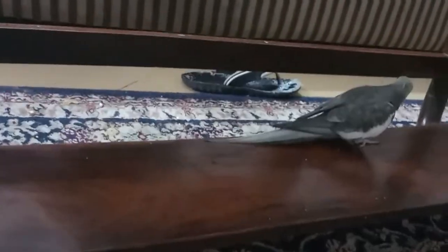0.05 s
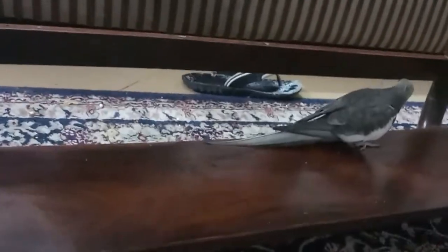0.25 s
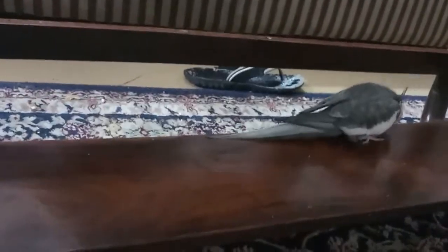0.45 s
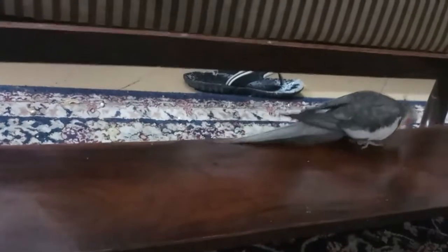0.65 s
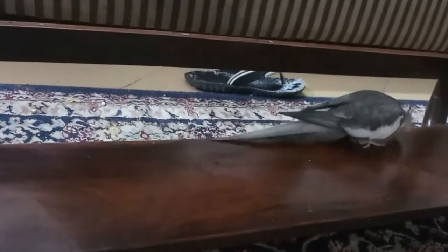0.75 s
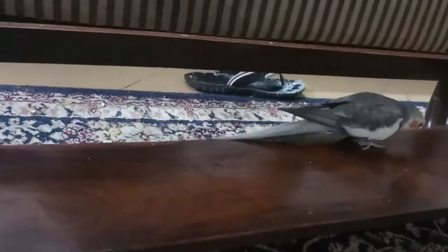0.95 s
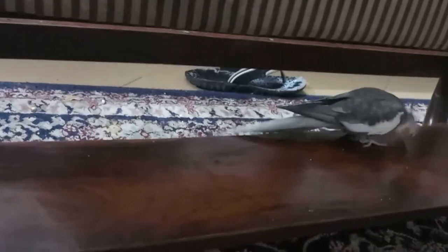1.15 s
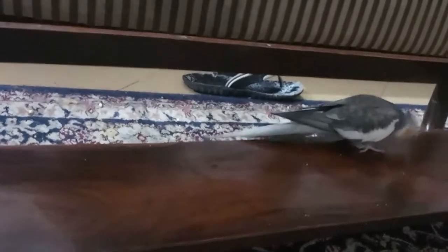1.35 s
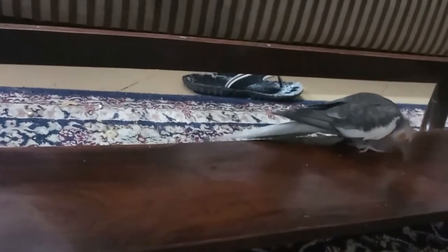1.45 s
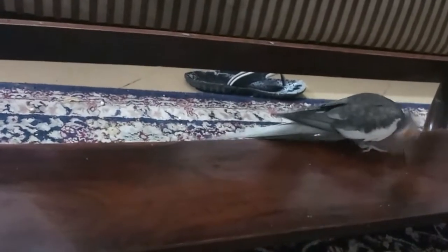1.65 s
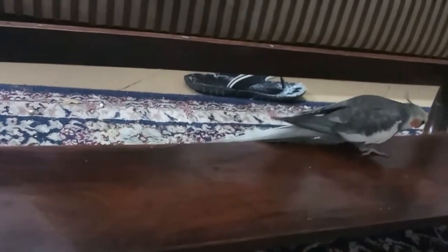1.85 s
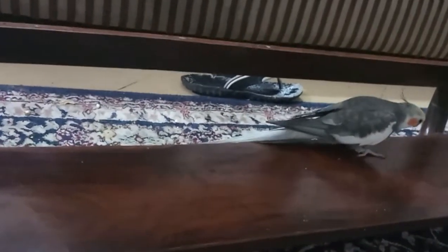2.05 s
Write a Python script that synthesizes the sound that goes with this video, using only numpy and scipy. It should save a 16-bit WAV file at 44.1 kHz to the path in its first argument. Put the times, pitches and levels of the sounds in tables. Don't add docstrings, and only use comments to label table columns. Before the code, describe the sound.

Rapid beak tapping on hard wood: first a few dull, slightly rattling knocks, then both overlap, then crisp pecks alone, ending in faint hum and hiss in a small carpeted room, heard close.

```python
import sys
import numpy as np
from scipy import signal
from scipy.io import wavfile
from scipy.ndimage import uniform_filter1d

SR = 44100
rng = np.random.default_rng(int(sys.argv[2]) if len(sys.argv) > 2 else 0)


def convert_level_to_amplitude(level_db):
    exponent = np.asarray(level_db, float) / 20
    return 10 ** exponent


def generate_wav(sig):
    pcm = np.round(np.clip(np.atleast_2d(sig).T, -1, 1) * 32767).astype(np.int16)
    wavfile.write(sys.argv[1], SR, pcm)


N = 92610

PECK_STARTS = [0.5378, 0.6454, 0.7869, 0.9287, 1.0726, 1.2232, 1.3707, 1.5221, 1.6795]
# strength_db, board_ring_db, beak_ring_hz, beak_ring_db
PECK_STRENGTHS = [
    (-33, -24, 3580, -6),
    (-23.5, -24, 3650, -6),
    (-22.5, -19.5, 3700, -14),
    (-22, -23, 3100, -15),
    (-25.5, -15, 3990, -25.5),
    (-25.5, -15.5, 4300, -11),
    (-22, -22, 4030, -10),
    (-24.5, -24.5, 3880, -6.5),
    (-30.5, -14.5, 4200, -7),
]
# low_ring_db, middle_ring_db, tip_near_11_khz_db, tip_near_15_khz_db
PECK_LANDINGS = [
    (-3, -7.5, -1.5, 6),
    (6, -2.5, 7, -10),
    (-1, 0.5, 0, -1),
    (-2.5, -0.5, -0.5, 2),
    (4.5, 3, -1, -7),
    (2, 1, -1, 6),
    (1, -8, -5.5, 6),
    (1.5, -3, -3.5, 3),
    (3.7, 3.7, -3, -11),
]
# frequency_hz, level_db
CLICK_SPECTRUM = [(400, -20.5), (1300, 2), (2200, -14.5), (3300, 13.5), (5000, 1), (6100, 2.5),
                  (11000, -12), (16000, -32)]
# frequency_hz, level_db, t60_s
EDGE_MODES = [(4040, -8.5, 0.0076), (4640, -4, 0.014), (5280, -22, 0.017), (6680, -18, 0.0032),
              (7930, -22.5, 0.014)]
# frequency_hz, level_db, t60_s
LOW_EDGE_MODES = [(750, -3.5, 0.0068), (914, -11.5, 0.023)]
# frequency_hz, level_db, t60_s
MIDDLE_EDGE_MODES = [(1219, -2.5, 0.015), (1399, -10.5, 0.051), (1512, -11.5, 0.042), (1703, -7, 0.028)]
# frequency_hz, level_db, t60_s
INLAND_MODES = [(2876, 8, 0.0065), (2557, 4.5, 0.022), (3104, 8, 0.021), (4837, 12, 0.011),
                (3307, 8, 0.019)]
# frequency_hz, level_db, t60_s
RIM_MODES = [(3310, -10.5, 0.025), (2152, -5, 0.0088), (5775, -6.5, 0.018)]
# frequency_hz, level_db, t60_s
BOARD_MODES = [(2684, 0, 0.13), (2694.5, 1.5, 0.1)]
# frequency_hz, lead_rad
PECK_PHASE_LEAD = [(500, 0.1), (900, 1.8), (1300, 2.56), (1800, 0.96), (2500, 1.8), (3500, 0.19),
                   (5000, 2.92), (9000, 0.62)]
# frequency_hz, difference_db
PECK_BALANCE = [(200, -5.5), (700, -2), (1400, -4), (2700, -2), (4400, 0), (6500, 7.5), (8100, -4.5),
                (12000, -2)]

KNOCK_STARTS = [0.2386, 0.4276, 0.5823, 0.7244, 0.8907, 1.0479, 1.1959, 1.3664]
# strength_db, boom_db, rattle_db, hardness_near_2_khz_db
KNOCK_STRENGTHS = [
    (-32, -4, -5.5, -7.5),
    (-30, -5, -3.5, -1.5),
    (-30, -5.5, -3.5, .1),
    (-31, -4.5, -2.5, 1),
    (-29, -4.5, -4, 0.4),
    (-33, -1.5, -1.5, -2.5),
    (-31.5, -9, -5, -2),
    (-28, -12, -10, 2.7),
]
# frequency_hz, level_db, t60_s
TOP_MODES = [(183.3, -3, 0.18), (270, -9, 0.15), (361, 0.5, 0.043), (485, 1.5, 0.11), (645.4, -4.5, 0.081),
             (971, -9, 0.16), (1133, -1, .1), (1262, -4, 0.16), (1314, -5.5, 0.084), (1565, -4.5, 0.12),
             (1846, -14, 0.18), (2300, -30, 0.022), (2694, 7.5, 0.017)]
# frequency_hz, level_db
THUD_SPECTRUM = [(200, -14), (550, -3), (760, -16), (1000, -2), (1400, -3.5), (2600, -12), (3300, -22),
                 (6000, -37.5)]
# frequency_hz, level_db, t60_s
BUMP_MODES = [(630, 1, .022), (1150, -5, .007), (1650, -2, .008), (2500, -8, .01)]
# delay_s, level_db
REFLECTIONS = [
    (0, -2.5),
    (.0085, -15),
    (.013, -10),
    (.0165, -5.5),
    (.021, -13),
    (.031, -4),
]
# frequency_hz, level_db
RATTLE_SPECTRUM = [(300, -31), (1250, -2.5), (2500, -1), (3400, -10.5), (4910, 0.5), (7800, -3.5),
                   (10000, -18), (16000, -48)]
# frequency_hz, lead_rad
KNOCK_PHASE_LEAD = [(300, 0.05), (600, 1.33), (1300, 0.95), (2500, 1.3), (9000, 1.5)]
# frequency_hz, difference_db
KNOCK_BALANCE = [(200, -1.5), (700, -3), (1400, 3.5), (2700, -3.5), (4400, 3.5), (6500, -4), (8100, -4),
                 (12000, 2)]

# frequency_hz, t60_s
ROOM_DECAY = [(150, 1), (400, 0.49), (1000, 0.33), (2700, 0.36), (5000, 0.28), (9000, 0.33)]
# frequency_hz, likeness
LIKENESS = [(60, 1), (180, 0.91), (550, 0.4), (1650, -0.26), (4970, -0.034), (15000, 0.064)]
# frequency_hz, level_db
AIR_SPECTRUM = [(15, -68), (25, -53), (102, -7), (241, -11), (306, -19.5), (372, -15), (438, -18.5),
                (565, -21), (900, -32), (1170, -80), (1980, -120)]
# time_s, level_db
AIR_SWELL = [(0.0, -57), (0.66, -59.5), (0.69, -77), (0.77, -52), (1.02, -51), (1.04, -75.5), (1.27, -55.5),
             (1.32, -75), (1.838, -51), (1.88, -89), (1.93, -52.5), (2.1, -82.5)]
# frequency_hz, level_db
HISS_SPECTRUM = [(530, -43), (900, -12.5), (2470, -14), (2960, -10.5), (3430, -11.5), (4920, -5.5),
                 (6640, -2), (7400, -15), (16000, -26)]
# frequency_hz, width_hz, level_db
FAN_LINES = [(100.5, 11, -61.5), (152, 10, -101), (192, 6, -75), (401.9, 60, -70.5), (566.4, 10, -69.5)]
# frequency_hz, difference_db
FLOOR_BALANCE = [(60, 0), (180, -0.5), (550, -1.5), (1650, -0.5), (4970, 4), (15000, -2.5)]


def peck(wood, strength_db, board_db, beak_hz, beak_db, low_db, mid_db, tip_db, top_db):
    t = np.arange(8000) / SR
    grain_db, grain_t60 = -20.5, 0.027
    grain = convert_level_to_amplitude(grain_db - 60 * t[:900] / grain_t60) * varied(wood, 0.4)
    contacts = grain.copy()
    rebound_s, rebound_gain = 0.0033, 0.35
    at = (rng.random((2, 5)) * rebound_s * SR).astype(int) % 400
    np.put_along_axis(contacts, at, rebound_gain * rng.choice([-1., 1.], (2, 5)), 1)
    contacts[:, 0] = grain[:, 0] = 1

    impulse = np.tile(1. * (t == 0), (2, 1))
    click = colour(impulse, CLICK_SPECTRUM)
    click = colour(click / abs(click).max(), [(8500, 0), (11500, tip_db), (14000, top_db)])
    click = signal.fftconvolve(click, contacts, axes=1)[:, :len(t)]

    groups = [(EDGE_MODES, -8), (LOW_EDGE_MODES, low_db - 7), (MIDDLE_EDGE_MODES, mid_db - 7.5),
              (INLAND_MODES, board_db), (RIM_MODES, beak_db)]
    rings = sum(ring(modes, t, PECK_PHASE_LEAD, lift_db) for modes, lift_db in groups)
    rings = rings * np.minimum(t / 0.0005, 1)
    rings = signal.fftconvolve(rings, grain, axes=1)[:, :len(t)]

    board = sum(convert_level_to_amplitude(board_db + db - 60 * t / t60) * np.sin(2 * np.pi * hz * t) for hz, db, t60 in BOARD_MODES)
    beak_lift_db, beak_t60, beak_lead_rad = 5.5, 0.021, 1.2
    beak_phase = 2 * np.pi * beak_hz * t + [[beak_lead_rad], [0]]
    beak = convert_level_to_amplitude(beak_db + beak_lift_db - 60 * t / beak_t60) * np.sin(beak_phase)
    hum = (board + beak) * np.minimum(t / 0.0008, 1)
    crack = rings + convert_level_to_amplitude(-1.03) * click
    return convert_level_to_amplitude(strength_db) * crack, convert_level_to_amplitude(strength_db) * hum


def knock(loose, strength_db, boom_db, rattle_db, hard_db):
    t = np.arange(12000) / SR
    push_s = 0.0021
    boom = ring(TOP_MODES, t, KNOCK_PHASE_LEAD) / 3 * np.minimum(t / push_s, 1)
    boom += convert_level_to_amplitude(-14.5) * burst(t, loose[0], THUD_SPECTRUM, hold_s=0.017, t60=0.24)
    early = t[:2000]
    bump = ring(BUMP_MODES, early, KNOCK_PHASE_LEAD) * np.minimum(early / 0.0005, 1)
    for delay_s, echo_db in REFLECTIONS:
        add(boom, delay_s, convert_level_to_amplitude(echo_db) * bump)
    rattle = burst(t, loose[1], RATTLE_SPECTRUM, hold_s=0.007, t60=0.055) / 2
    sound = convert_level_to_amplitude(strength_db) * (convert_level_to_amplitude(boom_db) * boom + convert_level_to_amplitude(rattle_db) * rattle)
    return colour(sound, [(800, 0), (1300, hard_db), (2800, hard_db), (4200, 0.0065)])


def ring(modes, t, lead, lift_db=0):
    hz, db, t60 = np.transpose(modes)[:, :, None]
    spot_db = 1.3 * rng.standard_normal((2, len(modes), 1))
    alternating = np.pi * np.arange(len(modes))[:, None]
    phase = alternating + np.array([read(lead, hz), 0 * hz])
    envelope = convert_level_to_amplitude(db + lift_db + spot_db - 60 * t / t60)
    return (envelope * np.sin(2 * np.pi * hz * t + phase)).sum(1)


def burst(t, loose, spectrum, hold_s, t60):
    rise_s = 0.00073
    shape = np.minimum(t / rise_s, 1) * convert_level_to_amplitude(-60 * np.maximum(t - hold_s, 0) / t60)
    return shape * evened(colour(varied(loose, 0.3), spectrum))


def varied(shared, new):
    return np.sqrt(1 - new ** 2) * shared + new * rng.standard_normal(shared.shape)


def room(x):
    taps = np.zeros((2, 22000))
    at = np.arange(0, 21980, 20) + rng.integers(0, 20, (2, 1099))
    np.put_along_axis(taps, at, rng.choice([-1., 1.], at.shape), 1)
    hz, t, z = signal.stft(taps, SR, nperseg=256)
    same = np.clip(read(LIKENESS, hz), 0, 1)[:, None]
    z = np.array([z[0], same * z[0] + np.sqrt(1 - same ** 2) * z[1]])
    decay = convert_level_to_amplitude(-60 * t / read(ROOM_DECAY, hz)[:, None])
    tail = signal.istft(z * decay, SR, nperseg=256)[1]
    delay_s = 0.004
    tail = np.pad(tail, ((0, 0), (int(delay_s * SR), 0)))
    return signal.fftconvolve(x, tail / np.linalg.norm(tail[0]), axes=1)[:, :N]


def floor():
    frames, hz = N // 512 + 5, np.fft.rfftfreq(2048, 1 / SR)
    a, b, c, d, patches = rng.standard_normal((frames, 1025, 5)).T
    patches_db = evened(uniform_filter1d(uniform_filter1d(patches, 14, 0), 6, 1))
    same = np.clip(read(LIKENESS, hz), -1, 1)[:, None]
    left = a + 1j * b
    right = same * left + np.sqrt(1 - same ** 2) * (c + 1j * d)
    z = np.array([left, right]) * convert_level_to_amplitude(patches_db)

    swell_db = np.interp(np.arange(frames) * 512 / SR, *np.transpose(AIR_SWELL))
    low = 1 / (1 + (hz[:, None] / 150) ** 4)
    air_db = 1.36 + swell_db.mean() + low * (swell_db - swell_db.mean())
    hiss_db, hiss_top_hz = -65.5, 21000
    layers = [(air_db, convert_level_to_amplitude(read(AIR_SPECTRUM, hz))),
              (hiss_db, convert_level_to_amplitude(read(HISS_SPECTRUM, hz)) * (hz < hiss_top_hz))]
    for line_hz, width_hz, db in FAN_LINES:
        layers.append((db, 1 / (1 + (2 * (hz - line_hz) / width_hz) ** 2)))
    power = sum((convert_level_to_amplitude(db) * evened(shape)[:, None]) ** 2 for db, shape in layers)
    noise = signal.istft(z * np.sqrt(power), nperseg=2048, noverlap=1536)[1][:, :N]
    return sides(evened(noise) * np.sqrt(power.mean()), FLOOR_BALANCE)


def evened(x):
    return x / np.sqrt(np.mean(x ** 2) + 1e-20)


def read(points, hz):
    f, value = np.transpose(points)
    return np.interp(np.log(hz + 1), np.log(f + 1), value)


def add(mix, start_s, sound):
    part = mix[:, round(start_s * SR):][:, :sound.shape[1]]
    part += sound[:, :part.shape[1]]


def colour(x, points, scale=1):
    db = scale * read(points, abs(np.fft.fftfreq(2048, 1 / SR)))
    log_gain = np.log(convert_level_to_amplitude(np.maximum(db, -100)))
    taps = np.fft.ifft(np.exp(np.conj(signal.hilbert(log_gain)))).real[:1024]
    taps = taps.reshape((1,) * (x.ndim - 1) + (-1,))
    return signal.oaconvolve(x, taps, axes=-1)[..., :x.shape[-1]]


def sides(x, points):
    return np.array([colour(x[0], points, 0.4), colour(x[1], points, -0.6)])


def scene():
    bird, board, table = np.zeros((3, 2, N))
    wood = rng.standard_normal((2, 900))
    loose = rng.standard_normal((2, 2, 12000))
    lag_s = 0.0008
    for start_s, strength, landing in zip(PECK_STARTS, PECK_STRENGTHS, PECK_LANDINGS):
        crack, hum = peck(wood, *strength, *landing)
        add(bird, start_s + lag_s, crack)
        add(board, start_s + lag_s, hum)
    for start_s, strength in zip(KNOCK_STARTS, KNOCK_STRENGTHS):
        add(table, start_s, knock(loose, *strength))
    bird, board = sides(bird, PECK_BALANCE), sides(board, PECK_BALANCE)
    table = sides(table, KNOCK_BALANCE)
    wet = convert_level_to_amplitude(-6) * room(bird + 0.2 * board)
    wet += convert_level_to_amplitude(-4.5) * room(table)
    return bird + board + table + wet + floor()


def band_limit(x):
    return signal.sosfilt(signal.butter(12, 16610, fs=SR, output="sos"), x)


def record(dry):
    low_pass = signal.cheby2(12, 60, 16900, fs=SR, output="sos")
    limited = signal.sosfilt(low_pass, dry)
    return band_limit(limited)


dry = scene()
out = record(dry)
generate_wav(out)
```